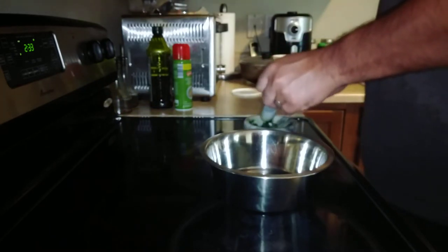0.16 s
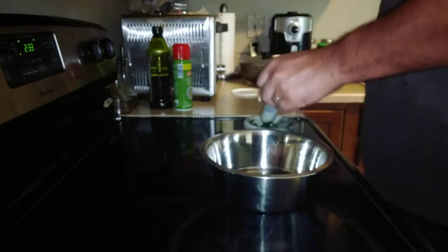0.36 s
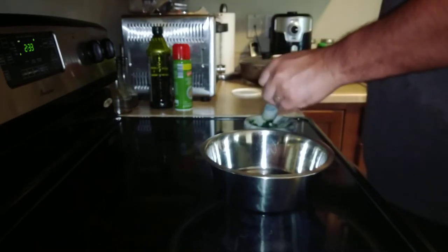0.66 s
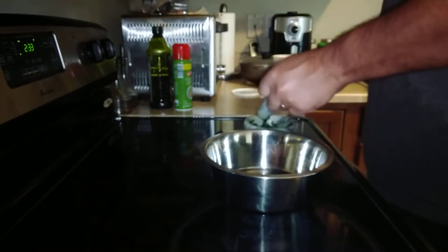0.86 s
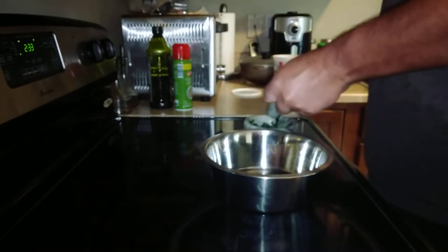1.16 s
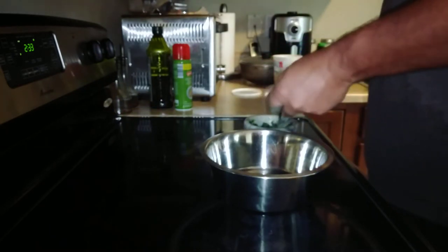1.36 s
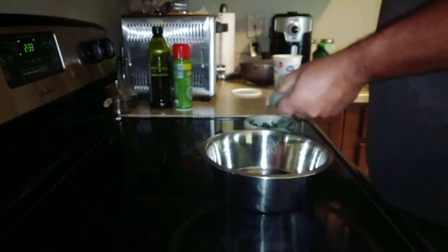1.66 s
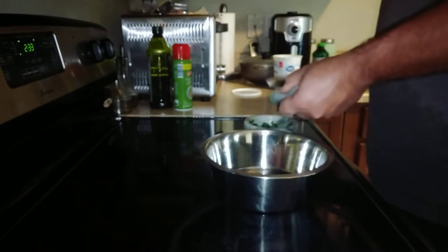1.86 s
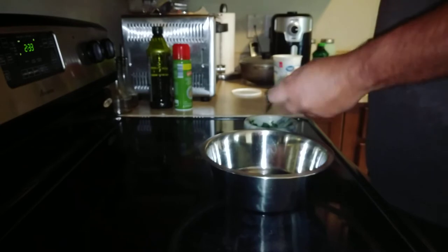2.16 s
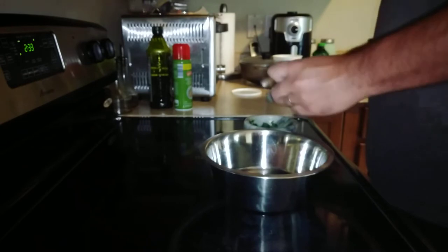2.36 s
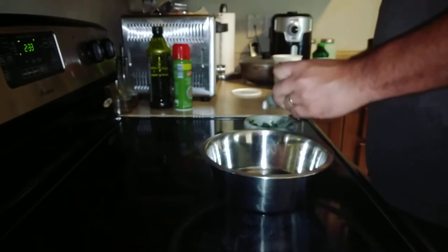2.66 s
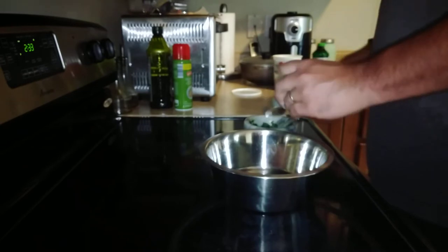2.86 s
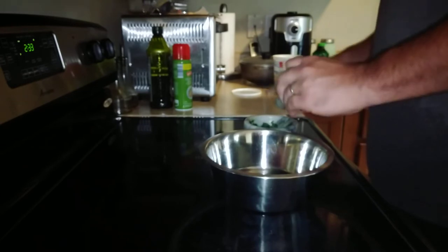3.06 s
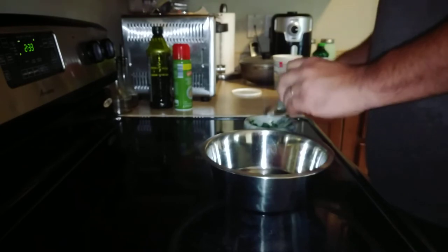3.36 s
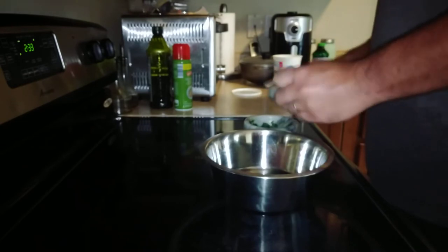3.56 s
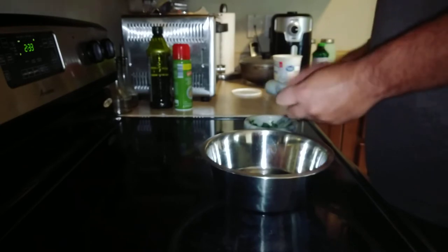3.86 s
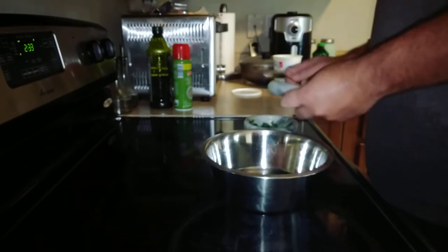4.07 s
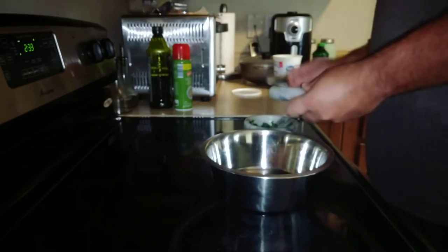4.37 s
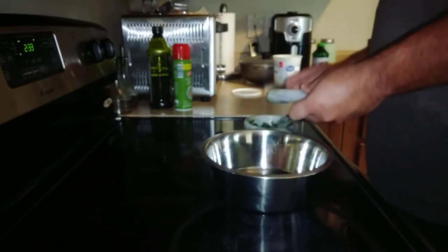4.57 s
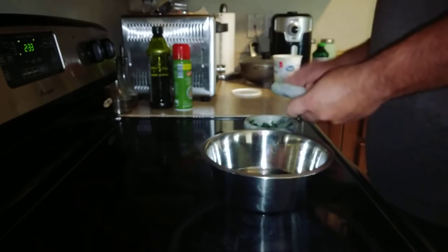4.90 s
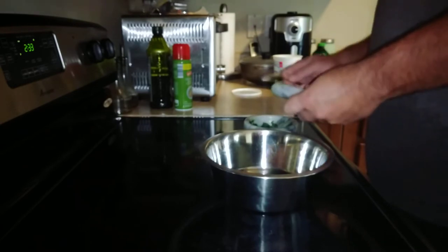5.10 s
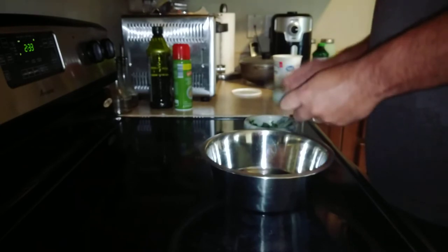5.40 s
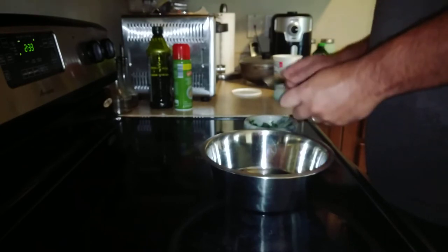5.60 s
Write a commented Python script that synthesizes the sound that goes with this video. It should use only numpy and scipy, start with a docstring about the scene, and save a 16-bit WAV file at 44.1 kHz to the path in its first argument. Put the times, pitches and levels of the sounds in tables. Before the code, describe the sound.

In a hard-walled home kitchen, a stone pestle strikes a small stone mortar about four times a second. Each blow is a bright, dry crack with a very short high ring and a dull counter knock beneath. Brief gritty scrapes come with some blows. The pounding pauses around two seconds, then resumes until the end. A refrigerator hums quietly throughout. Close stereo microphone, brighter on the left, with short, sparse room echoes.

```python
"""A refrigerator hums from start to end in a hard-walled kitchen: steady tones over soft coloured noise.
A stone pestle pounds food in a small stone mortar, about four blows a second, with a pause near 2 s.
Each blow is a burst of noise (the crack), decaying sines (both stones ringing) and a dull counter knock.
Short grinding pushes of noise ticks follow some blows; the mortar rocks with a knock near 3 s and 4.5 s.
Faint thin rings come after 5 s. Sparse echoes follow; the left microphone port hears more treble."""
import sys
import numpy as np
from scipy import signal
from scipy.fft import rfft, irfft
from scipy.io import wavfile
from scipy.ndimage import uniform_filter1d

SR = 44100
rng = np.random.default_rng(int(sys.argv[2]) if len(sys.argv) > 2 else 0)


def wav_out(sig):
    """Save sig, one row per channel (or a flat mono array), as 16-bit PCM at SR to the path in sys.argv[1]."""
    wavfile.write(sys.argv[1], SR, np.round(np.clip(np.atleast_2d(sig).T, -1, 1) * 32767).astype(np.int16))


N = 253130  # length in samples
# shares a left-right difference between the ports: plus half on the left, minus half on the right
SIDES = np.array([[1], [-1]]) / 2


def amp(db):
    """Turns decibels into gain."""
    return 10 ** (np.asarray(db) / 20)


def evened(x):
    """Scales a sound to rms 1."""
    return x / np.sqrt(np.mean(x ** 2) + 1e-20)


def read(points, hz):
    """Reads a curve between its points, on a log-frequency axis."""
    point_hz, value = np.transpose(points)
    return np.interp(np.log(hz + 1), np.log(point_hz + 1), value)


def add(mix, start_s, sound):
    """Mixes in a stereo sound, cutting off what falls outside the scene."""
    at = round(start_s * SR)
    rest = sound[:, max(-at, 0):]
    part = mix[:, max(at, 0):][:, :rest.shape[1]]
    part += rest[:, :part.shape[1]]


def colour(x, curve_db):
    """Filters by a dB curve given as a function of Hz."""
    hz = np.fft.rfftfreq(x.shape[-1], 1 / SR)
    return irfft(rfft(x) * amp(curve_db(hz)), x.shape[-1])


# compressor, fan and mains tones, rms levels: [pitch_hz, left_db, right_db]
HUM_TONES = [(119.86, -54, -60), (158.02, -67, -69), (177.53, -65.5, -68), (194.25, -60.5, -63),
             (236.94, -71, -78), (296.0, -75, -80), (355.06, -74, -75), (414.29, -72, -76)]
# colour of air and microphone noise: [pitch_hz, relative_level_db (per Hz)]
AIR_COLOUR = [(20, -8.5), (70, -8), (110, -5), (180, 2), (260, -3), (400, -3), (560, -8), (900, -15.5),
              (1250, -13), (1700, -19), (3000, -21), (7000, -24), (9000, -20.5), (11200, -13.5),
              (13000, -30), (15200, -29), (15700, -23), (16000, -39)]
# balance of that noise: [pitch_hz, left_minus_right_db]
AIR_BALANCE = [(60, 2), (110, 7), (200, 2), (380, 1.5), (700, -2.5), (1300, -1), (4400, -0.5), (8100, 4.5),
               (15000, 20.5)]
# how alike both ports hear it: [pitch_hz, likeness (-1 to 1, no unit)]
AIR_LIKENESS = [(60, 0.83), (130, 0.58), (290, 0.17), (640, 0.23), (1400, -0.34), (3000, 0.0012)]
AIR_DB = -59  # rms over both ports


def fridge():
    """Steady tones, nearly in step at both ports, over the wash of the room."""
    t = np.arange(N) / SR
    tones = np.zeros((2, N))
    for hz, left_db, right_db in HUM_TONES:
        turns = hz * t + rng.random() + SIDES / 16
        tones += amp([[left_db], [right_db]]) * np.sqrt(2) * np.sin(2 * np.pi * turns)
    left, other = rfft(rng.standard_normal((2, N)))
    hz = np.fft.rfftfreq(N, 1 / SR)
    same = read(AIR_LIKENESS, hz)
    pair = np.array([left, same * left + np.sqrt(1 - same ** 2) * other])
    pair *= amp(read(AIR_COLOUR, hz) + SIDES * read(AIR_BALANCE, hz))
    return tones + amp(AIR_DB) * evened(irfft(pair, N))


# time the echoes take to fall by 60 dB: [pitch_hz, t60_s]
ECHO_DECAY = [(500, 0.14), (1300, 0.34), (3500, 0.37), (9000, 0.33), (15000, 0.22)]
# balance of the echoes, on top of that of the dry sound: [pitch_hz, left_minus_right_db]
ECHO_BALANCE = [(1300, -8), (4400, -3), (12000, -6.5)]


def kitchen(dry):
    """Sparse echoes of random sign, each band dying at its own speed; three such tails take turns."""
    out, size = np.zeros((2, N)), SR // 2
    for k in range(3):
        # one echo at a random place in every 20 samples
        taps = np.zeros((2, size))
        at = np.arange(160, size - 20, 20) + rng.integers(0, 20, (2, (size - 161) // 20))
        np.put_along_axis(taps, at, rng.choice([-1., 1.], at.shape), 1)
        hz, t, bands = signal.stft(taps, SR, nperseg=256)
        balance_db = (SIDES * read(ECHO_BALANCE, hz))[..., None]
        bands *= amp(-60 * t / read(ECHO_DECAY, hz)[:, None] + balance_db)
        tail = signal.istft(bands, SR, nperseg=256)[1]
        tail *= np.sqrt(2) / np.linalg.norm(tail)
        # the tails trade places 1.3 times a second
        share = np.sqrt(2 / 3) * np.cos(2 * np.pi * (1.3 * np.arange(N) / SR + k / 3))
        out += signal.fftconvolve(dry * share, tail, axes=1)[:, :N]
    return out


def faint(start_s, end_s, hz, level_db):
    """A thin, uneven ring: a wavering sine that swells and fades."""
    t = np.arange(round((end_s - start_s) * SR)) / SR
    drift = uniform_filter1d(rng.standard_normal((2, 9000)), size=400)
    drift = uniform_filter1d(drift, size=400)
    waver = 0.004 * np.cumsum(evened(drift[0]))[:len(t)]  # radians
    flutter_db = 4 * evened(drift[1])[:len(t)]
    tone = np.sin(2 * np.pi * hz * t + waver)
    return amp(level_db + 2.7 * SIDES + flutter_db) * np.hanning(len(t)) * tone


# short tones of the counter: [pitch_hz, t60_s, relative_level_db]
COUNTER_TONES = [(45, 0.091, -42), (513, 0.04, -37), (730, 0.027, -0.5), (1202, 0.029, 1.5),
                 (1339, 0.1, -5.5), (1990, 0.021, 6)]


def knock(level_db):
    """A dull knock of the mortar into the counter: short sines of slightly random pitch."""
    t = np.arange(3072) / SR
    out = np.zeros((2, len(t)))
    for hz, t60, db in COUNTER_TONES:
        turns = hz * (1 + 0.034 * rng.standard_normal()) * t + 0.17 * rng.random((2, 1))
        out += amp(level_db + db - 6.1 * SIDES - 60 * t / t60) * np.sin(2 * np.pi * turns)
    return out


# balance of the stone sounds: [pitch_hz, left_minus_right_db]
STONE_BALANCE = [(400, 9.5), (1300, -2), (4400, -1), (6000, 9.5), (8500, 23.5), (15000, 4.5)]
SMALL_LOW_HZ, SMALL_HIGH_HZ = 3608, 13580
SMALL_DB, SMALL_SPREAD_DB = -22, 5  # relative level and its spread


def small_modes(count=28):
    """Many small modes, placed anew each time by grip and food, as rows like those of WEAK_MODES."""
    place, level, side = rng.random(count), *rng.standard_normal((2, count))
    pitch_hz = SMALL_LOW_HZ + (SMALL_HIGH_HZ - SMALL_LOW_HZ) * place ** 1.3
    return [(hz, 0.06, read(STONE_BALANCE, hz) / 2 + 4 * s, SMALL_DB + SMALL_SPREAD_DB * d)
            for hz, d, s in zip(pitch_hz, level, side)]


# strong modes (ways the stones ring): pestle low, mortar body, second, pestle main, fourth, pestle high
# [pitch_hz, t60_s, left_minus_right_db, relative_level_in_grinding_db, neighbour_spacing_hz]
STRONG_MODES = [(3348, 0.071, 4.5, -1.5, 63), (4395, 0.041, -3.5, -10, 131), (6940, 0.045, -4, -12, 40),
                (7938, 0.063, 11.5, 2.5, 112.5), (11050, 0.057, 13, -38, 118), (12500, 0.067, 13, 5, 64)]
# weaker modes: [pitch_hz, t60_s, left_minus_right_db, relative_level_db]
WEAK_MODES = [(2807, 0.072, 11, -20), (4010, 0.041, -9, -34), (4663, 0.027, 13, -7.5),
              (5355, 0.068, -6, -14.5), (6053, 0.041, -7.5, -14), (4934, 0.033, -16.5, -20),
              (8300, .05, 11.5, -20), (9400, 0.06, 18, -26), (9400, 0.077, 3, -14.5),
              (9580, 0.054, 25, -14.5), (12280, 0.05, 9, -16.5), (12700, 0.04, 4, -42)]
# colour of the grinding hiss: [pitch_hz, relative_level_db (per Hz)]
GRIT_COLOUR = [(600, -63), (1300, -17.5), (2200, -35), (3500, -2), (6000, 8), (9000, 6.5), (14000, -1),
               (15900, -40)]


def push(start_s, end_s, level_db, tilt_db, ring_db):
    """Grit under the sliding pestle: clumps of uneven ticks that hiss and keep the modes sounding."""
    count = round((end_s - start_s) * SR)
    clumps = uniform_filter1d(rng.standard_normal(8000), size=120)
    clumps_db = 2.5 * evened(uniform_filter1d(clumps, size=120))
    a, b = rng.standard_normal((2, 8000))
    ticks = np.array([a, 0.86 * a + 0.86 * b])  # partly alike at both ports
    ticks *= amp(1.7 * rng.exponential(1, 8000) + clumps_db)
    grit = np.zeros((2, count + 2500))  # leaves room for the ringing
    grit[:, :count] = evened(ticks)[:, :count] * signal.windows.tukey(count, .6)

    def hiss_db(hz):
        tilt = tilt_db * np.log2((hz + 500) / 7500)
        return read(GRIT_COLOUR, hz) + tilt + SIDES * read(STONE_BALANCE, hz)

    out = amp(-5.0) * colour(grit, hiss_db)
    weak = [(hz, t60, side, db + 0.5) for hz, t60, side, db in WEAK_MODES + small_modes()]
    for hz, t60, side_db, db, *_ in STRONG_MODES + weak:
        # the rubbing contact damps the ring to 40 ms at most
        r = np.exp(-np.log(1000) / (min(t60, .04) * SR))
        pole = r * np.exp(2j * np.pi * hz * 1.004 / SR)
        mode = signal.lfilter([np.sqrt(1 - r * r)], [1, -pole], grit).real
        tilt = tilt_db * np.log2(max(hz, 6000) / 6000)
        out += amp(db + ring_db + tilt + 0.96 * side_db * SIDES) * mode
    return amp(level_db) * out


def ring(t, hz, t60, side_db, level_db, split_hz, choke_ms):
    """One mode, split by the uneven stone into beating neighbours: swells while the stones touch, then dies."""
    detune, *jitter = rng.standard_normal(5)
    spread = np.array([0.17, 0.89, -0.96, 1.52, -1.73]) + 0.51 * np.array([0, *jitter])
    apart_hz = split_hz * spread
    # a phase for each neighbour, differing more between the ports at high pitch
    phase = rng.random((5, 1, 1)) + hz / 30000 * rng.standard_normal((5, 2, 1))
    turns = hz * (1 + 0.0017 * detune) * t + phase + np.multiply.outer(apart_hz, t)[:, None]
    beat = np.tensordot(amp([3, -8.5, -1.0, -15.5, -6.5]), np.sin(2 * np.pi * turns), 1)
    swell = (1 - np.exp(-t / 0.0015)) ** 2
    choke = amp(-60 * (t / (choke_ms / 1000)) ** 2)  # hand and food soon choke the ring
    shape = amp(-60 * t / t60) * swell * choke
    beating = shape * beat
    # beating leaves the energy on each side unchanged
    even = np.sqrt(np.sum(shape ** 2) / np.sum(beating ** 2, axis=1, keepdims=True))
    return amp(level_db + side_db * SIDES) * beating * even


# colour of the crack: [pitch_hz, relative_level_db (per Hz)]
CRACK_COLOUR = [(250, -27), (600, -23), (1200, -15.5), (1700, -17.5), (2500, -5), (4000, -2), (6000, -3),
                (8500, -2), (11000, -4), (13500, -4.5), (16000, -18.5)]
# how a blow catches the second and fourth strong modes: [base_db (relative to the crack),
# treble_share, low_share, main_share, high_share (all dB per dB), rise_db_per_s as the pounding goes on]
MODE_CATCH = [(-15.5, 0.62, -0.24, 0.71, 0.15, .1), (-17, 0.69, -0.16, 0.27, 0.094, 2.15)]
CATCH_SPREAD_DB = 0.5
KNOCK_DB, KNOCK_FOLLOWS = -51, 0.81  # knock level for a crack_db of -25; dB per dB of crack
WEAK_WANDER = 0.012  # share by which grip and food shift the weaker modes from blow to blow
WEAK_SPLIT_HZ, WEAK_CHOKE_MS = 98, 104


def blow(start_s, crack_db, treble_db, low_db, main_db, high_db, body_db, choke_ms):
    """A crack of stone on stone, the modes that it wakes, and a dull knock below."""
    t = np.arange(3072) / SR

    def tilt_db(hz):
        half_octaves = np.clip(np.log2((hz + 1) / 6000) / 0.5, 0, 1.3)
        return treble_db * half_octaves - 3 * (hz > 7000)

    def crack_curve_db(hz):
        return read(CRACK_COLOUR, hz) + tilt_db(hz) + SIDES * read(STONE_BALANCE, hz)

    a, b = rng.standard_normal((2, len(t)))
    noise = colour(np.array([a, .5 * a + 0.92 * b]), crack_curve_db)
    fade_db = -60 * t / 0.083 - 60 * (t / 0.11) ** 2
    out = amp(crack_db + 4.5 + fade_db) * (1 - np.exp(-t / 0.001)) ** 2 * noise

    catch_db = np.dot(MODE_CATCH, [1, treble_db, low_db, main_db, high_db, start_s])
    second_db, fourth_db = catch_db + CATCH_SPREAD_DB * rng.standard_normal(2)
    strong_db = [low_db, body_db, second_db, main_db, fourth_db, high_db]
    for (hz, t60, side, _, split_hz), db in zip(STRONG_MODES, strong_db):
        out += ring(t, hz, t60, side, crack_db + db + 5.0, split_hz, choke_ms)
    for hz, t60, side, db in WEAK_MODES + small_modes():
        shifted_hz = hz * (1 + WEAK_WANDER * rng.standard_normal())
        level_db = crack_db + db + tilt_db(hz) + 3 * rng.standard_normal()
        out += ring(t, shifted_hz, t60, side, level_db, WEAK_SPLIT_HZ, WEAK_CHOKE_MS)
    return out + knock(KNOCK_DB + KNOCK_FOLLOWS * (crack_db + 25.0))


# faint thin rings between blows: [start_s, end_s, pitch_hz, level_db]
FAINT_RINGS = [(5.0, 5.18, 2910, -74), (5.612, 5.646, 3420, -60)]
# the mortar rocks and knocks on the counter: [start_s, relative_level_db]
MORTAR_ROCKS = [(2.8598, -65), (3.3778, -62), (4.5064, -55.5)]
# grinding pushes: [start_s, end_s, relative_level_db, tilt_db (per octave), relative_stone_ring_db]
GRINDING_PUSHES = [(-0.02, 0.059, -42.5, 5, 0.5), (0.25, 0.324, -42.5, 2, -0.5),
                   (0.499, 0.575, -42, 2.5, -0.5), (0.743, 0.798, -44.5, 4, 1.5),
                   (1.02, 1.05, -45.5, -1, -4.5), (1.457, 1.494, -45.5, -9, -6),
                   (1.669, 1.719, -52, -11, -3), (3.132, 3.176, -38.5, -7, -4.5),
                   (3.35, 3.388, -42.5, -12, -4), (4.44, 4.523, -49.5, -0.5, -4),
                   (5.452, 5.482, -42.5, -11, -9), (5.664, 5.706, -50, -9, -6)]
# blows and rebounds: [start_s, relative_crack_db, treble_db (per half octave above 6 kHz),
# low_db, main_db, high_db (pestle rings, relative to the crack), body_db (mortar ring, likewise),
# choke_ms (time in which the choke alone takes the strong rings down by 60 dB)]
PESTLE_BLOWS = [(0.2343, -29.5, 2.5, -10, 7.5, 9.5, -6, 38), (0.2917, -56, 14, 11, 20, 11, 7, 38),
                (0.4869, -31, 5, -2, 6.5, 1, -0.5, 38.2), (0.7256, -28, 4, -0.5, 4.5, 2, -4, 48),
                (0.998, -25, 0.5, -44, -1.5, 5, -10.5, 38), (1.2135, -23.5, 2, -4, -0.5, 2, -3.5, 38.6),
                (1.4325, -22.5, -2, -5.5, -0.1, -7.5, -5, 38.3), (1.662, -29, 2, -6, 6, -3, -4, 37.8),
                (1.927, -24.5, -1, -4.5, 3.5, -3, -5.5, 38), (2.5566, -23.5, -0.3, -8, 5, -12, -9.5, 38),
                (2.822, -34, -8.5, -2, -4.5, -16, -4, 38), (2.8603, -40.5, -7.5, 1, -18, -28, -12, 38),
                (3.0988, -24.5, 2, -6.5, 2, 4, -5, 32), (3.105, -36.5, -7, -16, -3, 16.5, 2, 32),
                (3.3332, -23.5, 2, -10, 2, 1, -9, 42), (3.3774, -42, -9, 4.5, -20, -9, -8, 38),
                (3.599, -30.5, -3, -5.5, -4, -9, -4, 38.6), (3.8836, -34, -3, -2.5, -1.5, -19, -4.5, 38),
                (4.1338, -24.5, 1, -7.5, 5, -11, -3.5, 30), (4.1433, -45, -12, -16, 0, -4, -2, 38),
                (4.4177, -25.5, 7, -15, -18, 1, -4.5, 30), (4.424, -30.5, -19, -25, 11.5, -11, -15, 32),
                (4.4511, -37, -9, -3.5, -4, -5, -15, 45), (4.6669, -31, -6, -7, -6, -18, -6, 37.8),
                (4.925, -30.5, -0.5, 2.5, -3, -3.5, -7, 37.6), (5.1748, -25, -1, -1.5, -4.5, -4, -1.5, 38),
                (5.4248, -23.5, 3, -13.5, 6, -4, -9, 38), (5.4524, -41.5, -15, 5.5, -2, -14, 2, 37.8),
                (5.664, -24, 3.5, -4, 7.5, -12, -5, 38), (5.6942, -32.5, -21, -7, -22, -21, -8, 38.4)]


def scene():
    """Faint rings, knocks, pushes and blows, their echoes, and the hum."""
    stone = np.zeros((2, N))
    for row in FAINT_RINGS:
        add(stone, row[0], faint(*row))
    for start_s, level_db in MORTAR_ROCKS:
        add(stone, start_s, knock(level_db))
    for row in GRINDING_PUSHES:
        add(stone, row[0], push(*row))
    for row in PESTLE_BLOWS:
        add(stone, row[0] - .0007, blow(*row))  # the crack takes a moment to swell
    stone[1] = np.roll(stone[1], 12)  # the right port lies a little further away: 12 samples
    return fridge() + amp(-8.5) * kitchen(stone) + stone


def record(dry):
    """The band limit: a low-pass filter at 16.5 kHz."""
    low_pass = signal.firwin(255, 16500, window=("kaiser", 7), fs=SR)
    return signal.oaconvolve(dry, low_pass[None], "same")


dry = scene()
out = record(dry)
wav_out(out)
```